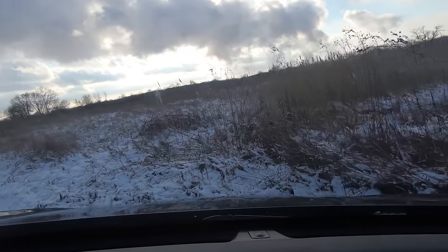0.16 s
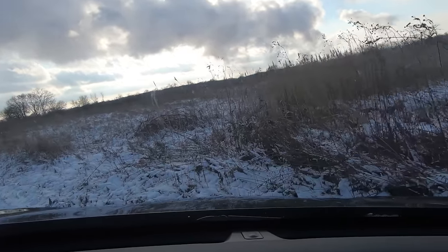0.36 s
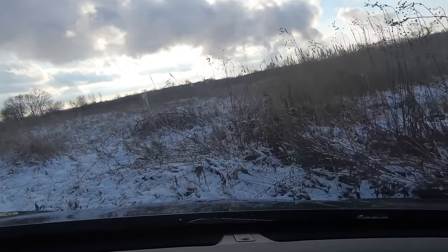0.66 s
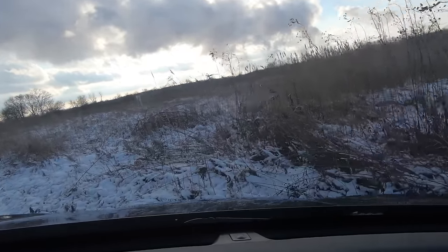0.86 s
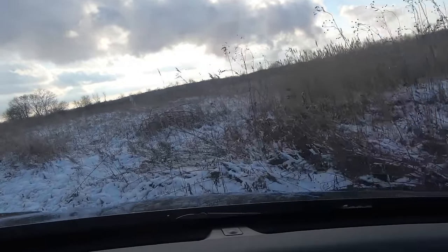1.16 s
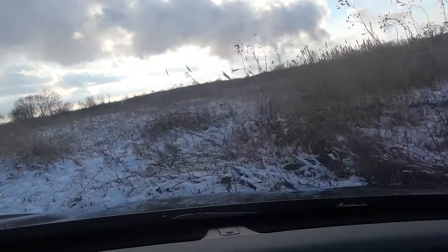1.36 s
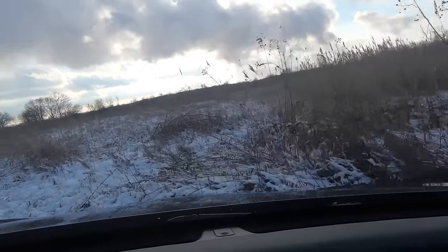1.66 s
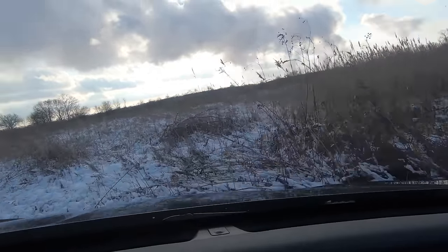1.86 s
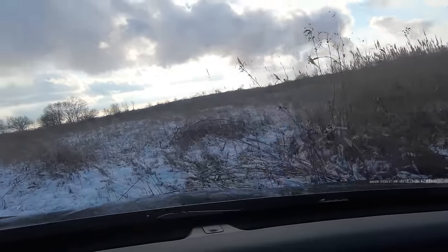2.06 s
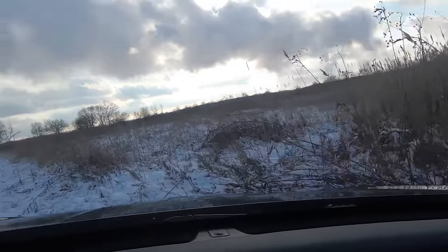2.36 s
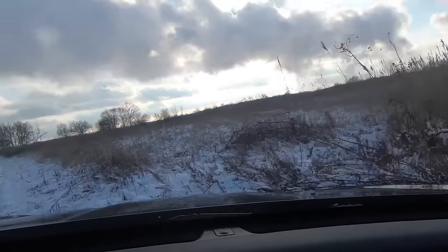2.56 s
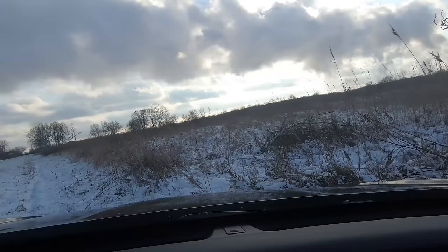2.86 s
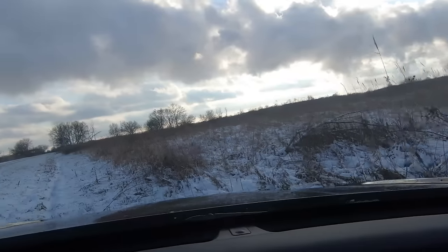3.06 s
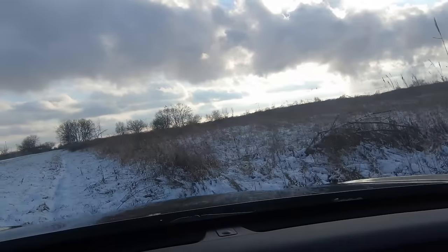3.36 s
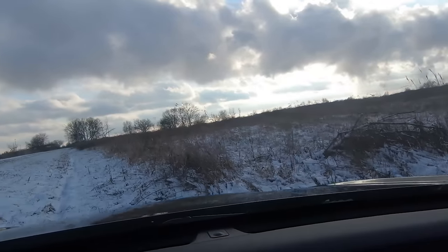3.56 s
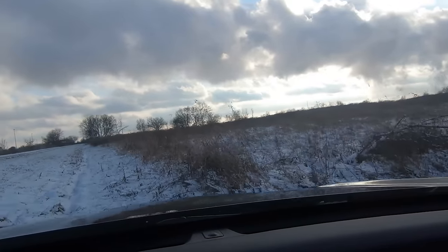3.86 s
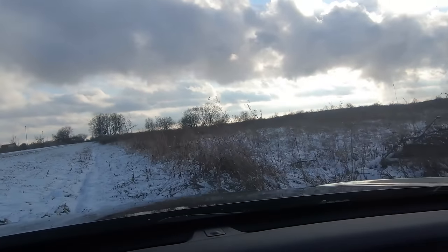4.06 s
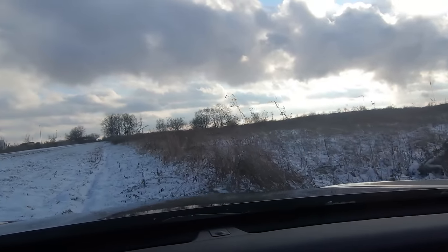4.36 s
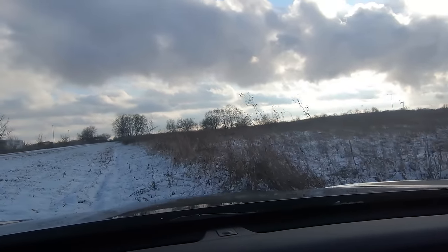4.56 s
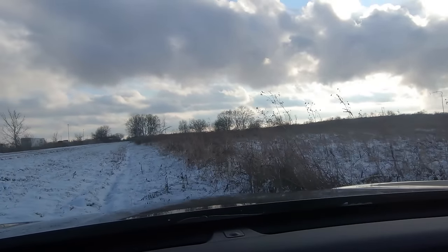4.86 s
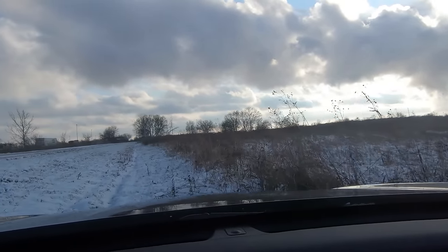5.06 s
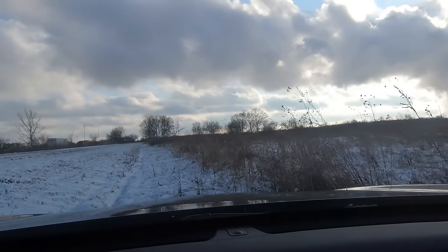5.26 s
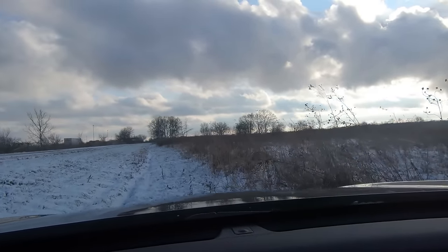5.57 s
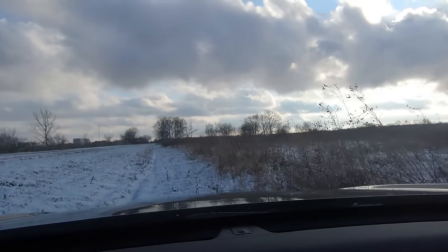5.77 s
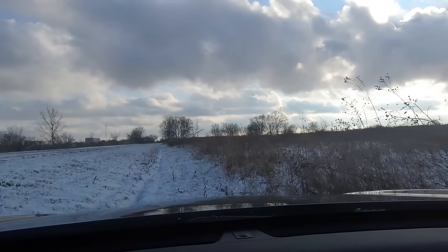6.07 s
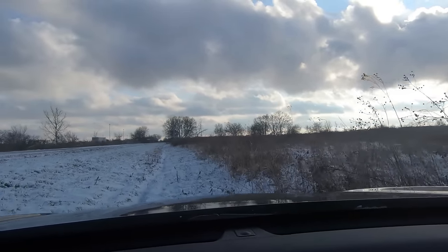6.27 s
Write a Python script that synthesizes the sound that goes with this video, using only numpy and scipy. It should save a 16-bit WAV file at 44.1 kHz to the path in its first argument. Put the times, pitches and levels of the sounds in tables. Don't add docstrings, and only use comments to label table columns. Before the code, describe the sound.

Inside a slow-moving vehicle on rough, snowy ground, a deep uneven rumble dominates throughout, booming and lurching with each bump, close and enclosed in stereo. A muted low engine dips slightly, climbs from about 1.6 to 3 seconds, then settles and eases lower. Fine snow and grass hiss over coarser scraping from the start, growing at 0.6-1.2 with short stick-slip slides, and a dull heavy thud at 1.25. A few light snaps lead to a dense run of dry stalk cracks from 2.3 to 3.3, loudest near 2.6, 2.8 and 3.2, with dull underfloor knocks. Brushing swells again at 3.4-4.2, with woody knocks on the sill at 3.7-4.0. A sweep and growing drag peak sharply just before 5.0 and stop. Brushing then thins, with soft knocks around 5.7-6.3, while the rumble continues to the end at 6.4.

```python
import sys
import numpy as np
from scipy import signal
from scipy.fft import rfft, irfft
from scipy.io import wavfile
from scipy.ndimage import uniform_filter1d

SR = 44100
rng = np.random.default_rng(int(sys.argv[2]) if len(sys.argv) > 2 else 0)


def to_linear_factor(level_db):
    exponent = np.asarray(level_db, float) / 20
    return 10 ** exponent


def pcm_store(signal):
    levels = np.round(np.clip(np.atleast_2d(signal), -1, 1) * 32767)
    wavfile.write(sys.argv[1], SR, levels.astype(np.int16).T)


N = 283122


def rms_one(x):
    return x / np.sqrt(np.mean(x ** 2) + 1e-20)


def seconds(length, step=1):
    return np.arange(0, length, step) / SR


def in_time(rows):
    s, *columns = np.transpose(rows)
    return [np.interp(seconds(N), s, column) for column in columns]


def at_hz(points, hz):
    point_hz, value = np.transpose(points)
    return np.interp(np.log(hz), np.log(point_hz), value)


def drift(rate):
    r = np.exp(-np.pi * rate * 40 / SR)
    slow = signal.lfilter([1], [1, -2 * r, r * r], rng.standard_normal(N // 40 + 2002))[2000:]
    return np.interp(np.arange(N) / 40, np.arange(len(slow)), rms_one(slow - slow.mean()))


def resonance(x, hz, width):
    r = np.exp(-np.pi * width / SR)
    poles = [1, -2 * r * np.cos(2 * np.pi * hz / SR), r * r]
    return signal.lfilter([(1 - r * r) / 2, 0, (r * r - 1) / 2], poles, x)


def double_resonance(x, hz, width):
    return resonance(resonance(x, hz, width), hz, width)


# frequency in Hz, left-right likeness [-1 to 1].
PORT_LIKENESS = [(200, 0.98), (350, 0.97), (640, 0.39), (1000, -0.34), (1400, -0.062), (3000, 0.42),
                 (7000, 0.0098), (15000, -0.35)]


def coloured(spectrum, length):
    hz = np.maximum(np.fft.rfftfreq(length, 1 / SR), 1)
    mid, side = rfft(rng.standard_normal((2, length)))
    alike = np.clip(at_hz(PORT_LIKENESS, hz), -1, 1)
    gain = (hz > spectrum[0][0]) * to_linear_factor(at_hz(spectrum, hz))
    both = np.sqrt(1 + alike) * mid + np.sqrt(1 - alike) * side * np.array([[1], [-1]])
    return rms_one(irfft(both * gain, length))


def panned(x, db):
    return x * to_linear_factor(np.array([db / 2, -db / 2]).reshape(2, -1))


def burst(t60, rise_s):
    t = seconds(SR // 5)
    return (1 - np.exp(-t / rise_s)) * to_linear_factor(-60 * t / t60)


def grain(length, depth_db, hold_s):
    hold = round(hold_s * SR)
    steps = np.repeat(rng.standard_normal(length // hold + 1), hold)[:length]
    return rms_one(uniform_filter1d(to_linear_factor(depth_db * steps), hold // 2 + 1))


def add(out, s, sound):
    i = round(s * SR)
    out[:, i:i + sound.shape[1]] += sound[:, :N - i]


# time in seconds, firing rate in Hz, level of the firing order in dB.
ENGINE_SPEED = [(0, 108, -48), (1.6, 102, -46), (1.9, 125, -41), (2.1, 130, -39), (2.5, 136, -40),
                (2.85, 146, -43), (3.2, 146, -46), (3.7, 138, -45), (4.5, 136, -46), (5.3, 131, -47),
                (5.85, 119, -46), (6.42, 117, -48)]
# multiple of the firing rate, level in dB.
ENGINE_ORDERS = [(.5, -6), (.75, -5), (1, 0), (1.5, -4), (2, -16)]


def engine():
    firing_hz, level_db = in_time(ENGINE_SPEED)
    turn = 2 * np.pi * np.cumsum(firing_hz) / SR
    out = np.zeros(N)
    for multiple, db in ENGINE_ORDERS:
        gain = to_linear_factor(level_db + db + 3 + 3.5 * drift(2.5))
        out += gain * np.sin(multiple * turn + rng.uniform(0, 2 * np.pi))
    return out


# time in seconds, roughness in dB.
SNOW_ROUGHNESS = [(0, -1), (.7, -.5), (1.3, -2), (1.65, -1.5), (1.95, 2.5), (2.4, 0), (2.8, 3.5),
                  (3.6, 2.5), (4.4, .5), (5.7, .5), (6.42, 0)]
# time in seconds, peak in dB, hardness [0-3], length in seconds.
WHEEL_BUMPS = [(.03, -28, 1.2, .06), (.39, -28, 1.2, .05), (.73, -21, 1, .12), (.84, -27, .3, .05),
               (1.03, -28, 2.1, .07), (1.25, -28, 1.1, .04), (1.62, -27, 1.1, .09), (2.05, -23.5, 1.3, .11),
               (2.27, -29, .4, .07), (2.36, -26, 1.2, .04), (2.48, -21, 1.2, .035), (2.59, -22, 1.1, .035),
               (2.63, -23, 2, .04), (2.8, -26, 1.6, .11), (3.19, -27, 1.8, .09), (3.25, -21, .8, .08),
               (3.54, -24, 1.2, .07), (3.86, -25, 1.7, .07), (4.07, -27, .5, .06), (4.11, -27, 1.5, .05),
               (4.43, -27, 1.1, .05), (4.6, -25, 1, .03), (4.67, -25, .7, .05), (4.77, -28, 1.9, .06),
               (5.22, -31, 1, .06), (5.49, -29, 1.1, .04), (5.8, -31, 2.1, .06), (5.92, -30, 1.1, .07),
               (6.38, -31, 1, .06)]
# time in seconds, peak in dB, length in seconds.
BODY_LURCHES = [
    (.45, -31, .06),
    (1.09, -24, .05),
    (1.42, -30, .16),
    (3.44, -31, .1),
    (4.47, -32, .12),
    (4.95, -29, .15),
    (5.25, -35, .2),
    (6.16, -33, .08),
]
# hardness it answers best [0-3], steady level in dB, level on a bump in dB.
SHAKEN_LAYERS = [
    (0, -45, 0),
    (1, -37, 0),
    (2, -36, 0),
    (3, -49, -11),
]


def shaken():
    misfit_db, fall_db = 10.5, 9
    t = seconds(N, 64)
    rough_db = in_time(SNOW_ROUGHNESS)[0][::64]
    rows = WHEEL_BUMPS + [(s, db, 0, length) for s, db, length in BODY_LURCHES]
    s, db, hard, length = np.transpose(rows)[:, :, None]
    swell_db = db - fall_db * np.abs(t - s) / length
    levels = []
    for suits, steady_db, bump_db in SHAKEN_LAYERS:
        bumps = np.linalg.norm(to_linear_factor(swell_db + bump_db - misfit_db * (hard - suits) ** 2), axis=0)
        total = np.hypot(to_linear_factor(steady_db + rough_db), bumps)
        levels.append(np.interp(seconds(N), t, 20 * np.log10(total)))
    return levels


def air_modes(modes, evenness, window_s):
    shake = rng.standard_normal(N + SR)
    out = np.zeros(N + SR)
    for k, (hz, width, db) in enumerate(modes):
        out += to_linear_factor(db) * rms_one(double_resonance(shake, hz, width)) * (-1) ** k
    out = out[SR:]
    window = int(window_s * SR)
    power = uniform_filter1d(uniform_filter1d(out ** 2, window), window)
    swell = np.sqrt(power + 1e-12)
    return rms_one(out / swell ** np.clip(evenness, 0, 1))


# frequency in Hz, width in Hz, level in dB.
HEAVE_MODES = [(36.5, 26.5, 0)]
BOOM_MODES = [(61.33, 9.5, 1), (72.4, 20.8, -2.5)]
DRONE_MODES = [(100.9, 18.5, 2), (132.7, 25.3, -3), (165.3, 15, -6), (190.15, 20, -3), (226.5, 19, -10),
               (275.4, 30, -15)]
# frequency in Hz, width in Hz, level in dB.
CROSS_MODES = [(1300, 70, -67), (850, 170, -66.5), (150.4, 7.4, -52.5), (70, 80, -56), (215, 60, -65)]
# frequency in Hz, level in dB per Hz.
PANEL_COLOUR = [(130, -0.5), (220, -9.5), (278, -6.5), (318, -10), (357, -10.5), (409, -16), (444, -15),
                (562, -20), (675, -20.5), (825, -22), (2110, -32), (2490, -30), (12000, -71), (15600, -107),
                (22000, -120)]


def ground():
    heave_db, boom_db, drone_db, panel_db = shaken()
    low = to_linear_factor(heave_db) * air_modes(HEAVE_MODES, evenness=0.6, window_s=0.05)
    low = low + to_linear_factor(boom_db) * air_modes(BOOM_MODES, evenness=0.98, window_s=0.067)
    low = low + to_linear_factor(drone_db - 1.5) * air_modes(DRONE_MODES, evenness=0.7, window_s=0.04)
    across = np.zeros(N)
    for hz, width, db in CROSS_MODES:
        across += to_linear_factor(db) * air_modes([(hz, width, 0)], evenness=0, window_s=0.03)
    across = across * to_linear_factor(1.2 * (panel_db - panel_db.mean()))
    sway = to_linear_factor(-49.5) * air_modes([(20, 8, 0)], evenness=0, window_s=0.1)
    panels = to_linear_factor(panel_db + 4 + 1.6 * drift(30)) * coloured(PANEL_COLOUR, N)
    return low + panels + (across + sway) * [[1], [-1]]


def passes(rows):
    rise_db_per_s, fade_db_per_s = 400, 650
    t = seconds(N, 32)
    start, end, db, swell_db = np.transpose(rows)[:, :, None]
    level_db = db + swell_db * np.clip((t - start) / (end - start), 0, 1)
    level_db = level_db - rise_db_per_s * np.maximum(start - t, 0)
    level_db = level_db - fade_db_per_s * np.maximum(t - end, 0)
    return np.interp(seconds(N), t, np.sum(to_linear_factor(2 * level_db), axis=0))


# start in seconds, end in seconds, level at the start in dB, swell in dB.
FINE_SWEEPS = [(0, .5, -62, 0), (.32, .38, -60, 0), (.5, .63, -61, 7), (.63, .94, -53, -1),
               (.95, 1.078, -51.5, 3), (1.09, 1.205, -58, -2), (1.21, 1.42, -63, -3), (1.44, 1.63, -56, 0),
               (1.64, 1.72, -59, -3), (1.73, 1.925, -52.5, 3), (1.94, 2.285, -59, 3), (2.3, 2.63, -63, -1),
               (2.85, 3.02, -66, 7), (3.03, 3.17, -65, -4), (3.265, 3.36, -60, 1), (3.37, 3.67, -53, -4),
               (3.68, 4.03, -52, 5), (4.04, 4.28, -50, -14), (4.29, 4.4, -61, -6), (4.68, 4.992, -75, 28),
               (5.0, 5.135, -57, -3), (5.14, 5.27, -59, 3), (5.28, 5.44, -57, -10), (5.45, 5.7, -63.5, 1),
               (5.77, 5.86, -71, 3), (5.89, 6.04, -68, 5), (6.1, 6.22, -72, 11), (6.23, 6.33, -62, -4),
               (6.34, 6.42, -65, 10)]
# start in seconds, end in seconds, level at the start in dB, swell in dB.
COARSE_SCRAPES = [(.03, .48, -58, 1), (.5, .63, -53, 5), (.63, .93, -48, -1), (.95, 1.08, -44, 1),
                  (1.09, 1.21, -51, -3), (1.32, 1.43, -63, 5), (1.94, 2.28, -59, -1), (2.38, 2.6, -58, 0),
                  (2.6, 2.78, -54, -2), (2.8, 2.885, -53, 6), (2.89, 3.03, -52, -1), (3.04, 3.64, -55, -1),
                  (3.885, 4.05, -49, -5), (4.06, 4.26, -51, -8), (4.76, 4.99, -63, 11), (5.02, 5.3, -57, 1),
                  (5.32, 6.05, -59, 0), (6.19, 6.42, -57, 1)]
# frequency in Hz, level in dB per Hz.
HISS_COLOUR = [(1500, -56), (3000, -13), (4200, -5), (6000, -6.5), (7600, -9), (9000, -7.5), (10200, -16),
               (12000, -20), (14000, -24), (15500, -42)]
SCRAPE_COLOUR = [(300, -3), (550, -7), (900, -0.5), (1500, 1), (2700, 0), (3500, -3), (4300, -16),
                 (6000, -50)]


def brushing():
    far_hiss_db, far_scrape_db, sweep_scrape_db = -77, -75, -2
    sweep = passes(FINE_SWEEPS)
    hiss_gain = np.sqrt(sweep + to_linear_factor(2 * far_hiss_db))
    scrape_power = sweep * to_linear_factor(2 * sweep_scrape_db) + passes(COARSE_SCRAPES) + to_linear_factor(2 * far_scrape_db)
    flicker_db = 0.5 * drift(17) + 0.8 * drift(120)
    hiss = coloured(HISS_COLOUR, N) * hiss_gain * to_linear_factor(flicker_db)
    hiss = panned(hiss, -3 + 3.3 * drift(0.5))
    scrape = coloured(SCRAPE_COLOUR, N) * np.sqrt(scrape_power) * to_linear_factor(flicker_db + 0.43 * drift(32))
    return hiss + scrape


def gliding_ring(hz, width):
    r = np.exp(-np.pi * width / SR)
    draws = rng.standard_normal((2, 2, len(hz)))
    slow = signal.lfilter([1], [1, -2 * r, r * r], draws[0] + 1j * draws[1])
    slow = slow + 0.61 * slow[::-1]
    carrier = np.exp(2j * np.pi * np.cumsum(hz) / SR)
    return rms_one((slow * carrier).real)


# start in seconds, end in seconds, level at the start in dB, first ring in Hz, last ring in Hz.
PANEL_SLIDES = [
    (0.596, 0.821, -53, 950, 1560),
    (0.936, 1.014, -51, 1300, 883),
    (1.021, 1.081, -42.5, 850, 1627),
]
# start in seconds, end in seconds, level at the start in dB, level at the end in dB, ring in Hz.
STEADY_DRAGS = [
    (1.082, 1.112, -46, -65, 1850),
    (4.9, 4.993, -61, -43, 2050),
]
# frequency in Hz, width in Hz, level in dB.
STROKE_RINGS = [(2700, 250, -2.5), (3300, 350, -3), (5500, 2500, -7)]


def strokes():
    slide_db_per_octave = -8.5
    rows = [(*row, row[-1]) for row in STEADY_DRAGS]
    for start, end, db, from_hz, to_hz in PANEL_SLIDES:
        db_to = db + slide_db_per_octave * np.log2(to_hz / from_hz)
        rows.append((start, end, db, db_to, from_hz, to_hz))
    out = np.zeros((2, N))
    for start, end, db_from, db_to, from_hz, to_hz in rows:
        along = np.linspace(0, 1, round((end - start) * SR))
        rings = gliding_ring(from_hz + (to_hz - from_hz) * along, 360)
        for hz, width, db in STROKE_RINGS:
            rings = rings + to_linear_factor(db) * gliding_ring(hz + 0 * along, width)
        edges = np.clip(np.minimum(along, 1 - along) * (end - start) / 0.0024, 0, 1)
        slips = grain(len(along), depth_db=3, hold_s=0.004)
        add(out, start, rings * slips * edges * to_linear_factor(db_from + (db_to - db_from) * along))
    return out


# time in seconds, peak in dB, ring in Hz, t60 in seconds, left-right level in dB.
SILL_KNOCKS = [
    (3.693, -39, 1520, 0.074, 0.5),
    (3.790, -32.5, 1420, 0.14, 2.0),
    (3.886, -33, 1380, 0.22, -6),
    (3.914, -32, 1500, 0.076, 0),
    (4.016, -40.5, 1190, 0.17, -2),
    (4.435, -47, 1210, 0.092, -6),
    (6.069, -50, 1500, 0.13, -12),
    (6.204, -44, 1490, 0.076, 11),
    (6.28, -44, 1290, 0.16, -3),
]
# time in seconds, peak in dB, ring in Hz, left-right level in dB.
UNDERFLOOR_KNOCKS = [(0.954, -26, 246, -3), (2.637, -24, 280, 1), (3.097, -30, 250, 2),
                     (3.123, -27.5, 290, 3), (3.153, -26.5, 316, 0), (3.169, -26, 334, -3),
                     (5.714, -34.5, 280, -1.0), (5.792, -31.5, 310, 0), (5.825, -33, 248, 4),
                     (6.008, -31, 288, 1.5), (6.205, -34, 293, -2)]


def knocks():
    sill_thump_db, floor_thump_db, floor_t60_s = -3, -5.5, 0.19
    rows = [(*row, sill_thump_db) for row in SILL_KNOCKS]
    rows += [(s, db, hz, floor_t60_s, pan_db, floor_thump_db) for s, db, hz, pan_db in UNDERFLOOR_KNOCKS]
    out = np.zeros((2, N))
    for s, db, hz, t60, pan_db, thump_db in rows:
        rise_s = 3 / np.sqrt(hz * 470)
        noise = coloured(SCRAPE_COLOUR, SR // 5)
        thump = rms_one(double_resonance(coloured(SCRAPE_COLOUR, SR // 5), 520, 420))
        ring = rms_one(double_resonance(coloured(PANEL_COLOUR, SR // 5), hz, 0.27 * hz))
        sound = ring + to_linear_factor(-21) * noise + to_linear_factor(thump_db) * thump
        add(out, s - 0.002, panned(to_linear_factor(db - 1.5) * sound * burst(t60, rise_s), pan_db))
    return out


# frequency in Hz, level in dB, t60 in seconds.
THUD_RINGS = [(217, -9.5, 0.06), (152, -22, 0.14), (540, -35, 0.05)]


def thud():
    thud_s, push_s = 1.253, 0.014
    t = seconds(SR // 5)
    modes = np.zeros(len(t))
    for hz, db, t60 in THUD_RINGS:
        modes += to_linear_factor(db - 60 * np.maximum(t - push_s, 0) / t60) * np.sin(2 * np.pi * hz * t)
    contact = to_linear_factor(-13) * np.sin(2 * np.pi * 380 * t) * burst(0.045, 0.0025)
    out = np.zeros((2, N))
    add(out, thud_s, panned(modes * np.clip(t / push_s, 0, 1) + contact, 1.8))
    return out


# time in seconds, peak in dB, ring in Hz, body part in dB, bright part in dB.
STALK_SNAPS = [(1.197, -43.5, 3080, -7, -4.5), (1.2476, -34, 2160, -2, -16), (1.2644, -36, 2820, 4, -21),
               (1.713, -45, 3450, 10.5, -2), (2.2937, -36, 2880, 10, -12), (2.3755, -34, 2450, -0.5, -15),
               (2.4102, -29.5, 2330, -1, -11), (2.457, -35, 2080, -2, -9), (2.4717, -38.5, 2080, 11.5, -10),
               (2.5086, -21, 2790, -1, -12), (2.6362, -15, 2790, -7.5, -25), (2.6778, -21, 2540, -30, -20),
               (2.7966, -11, 3300, -11, -19), (2.834, -19, 2460, -7.5, -21), (2.8714, -35, 3600, -21, -10),
               (2.8976, -33.5, 3020, -6, -16), (3.014, -30.5, 3930, -6, -12),
               (3.173, -30.5, 2930, -10, -13), (3.1929, -14, 3200, -15, -8.5),
               (3.2844, -24, 3030, -1, -6.5)]
# time in seconds, peak in dB, ring in Hz.
STEM_TICKS = [(2.34, -40, 2280), (2.5561, -43, 2550), (2.6934, -29, 2820), (2.6544, -42, 2810),
              (2.7406, -36, 2760), (2.9565, -35, 2740), (3.051, -39, 2800), (3.075, -36, 2370),
              (3.133, -39, 2030), (3.25, -41, 2100), (3.318, -36, 3110), (3.3497, -36.5, 2620),
              (4.1724, -40.5, 2830), (6.347, -40.5, 3040)]
# frequency in Hz, level in dB per Hz.
STALK_RING_COLOUR = [(1200, 2), (2000, -2.5), (3000, 1), (4200, -2.5), (5500, -13), (8000, -31)]
BRIGHT_CRACK_COLOUR = [(2500, -20), (4200, 6.5), (5500, 4.5), (7500, -2), (9200, -10), (10500, -24.5),
                       (14000, -37)]


def snaps():
    tick_body_db, tick_bright_db = -13, -14
    length = SR // 5
    rows = STALK_SNAPS + [(*row, tick_body_db, tick_bright_db) for row in STEM_TICKS]
    out = np.zeros((2, N))
    for s, db, hz, body_db, bright_db in sorted(rows):
        t60 = 0.075 - 0.001 * (db + 30)
        ring = rms_one(resonance(coloured(STALK_RING_COLOUR, length), hz, 1180))
        body = rms_one(resonance(coloured(SCRAPE_COLOUR, length), 580, 400))
        crack = to_linear_factor(bright_db + 4.5) * coloured(BRIGHT_CRACK_COLOUR, length)
        crack = crack * (burst(0.93 * t60, 0.00069) + 0.66 * burst(0.0092, 0.0006))
        crackle = grain(length, depth_db=3.4, hold_s=0.00294) * burst(1.3 * t60, 0.00082)
        ring = to_linear_factor(-2.5) * ring * (crackle + 1.12 * burst(0.018, 0.00065))
        echo = to_linear_factor(body_db - 0.5) * body * burst(1.43 * t60, 0.0021)
        add(out, s - 0.0005, panned(to_linear_factor(db - 9) * (crack + ring + echo), 0.61))
    return out


# frequency in Hz, width in Hz, level in dB.
CABIN_WIDTH_MODE = (146.5, 25, -12)


def scene():
    bass = engine() + ground() + knocks() + thud()
    hz, width, db = CABIN_WIDTH_MODE
    across = to_linear_factor(db) * resonance(resonance(bass.mean(axis=0), hz, width), hz, 2.6 * width)
    return bass + across * [[1], [-1]] + brushing() + strokes() + snaps()


def top_cut(x):
    return signal.sosfilt(signal.butter(12, 15600, fs=SR, output="sos"), x)


# treble resonance in Hz, width in Hz, lift in dB.
MICROPHONE_PORTS = [(7240, 1060, 10.5), (8060, 1840, 8.5)]


def record(dry):
    ports = []
    for x, (hz, width, db) in zip(dry, MICROPHONE_PORTS):
        ports.append(x + (to_linear_factor(db) - 1) * resonance(x, hz, width))
    return top_cut(np.array(ports))


dry = scene()
out = record(dry)
pcm_store(out)
```